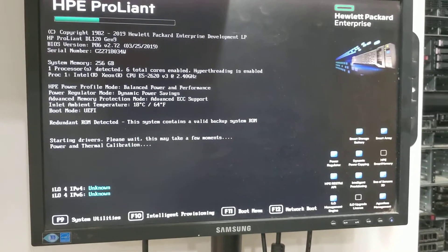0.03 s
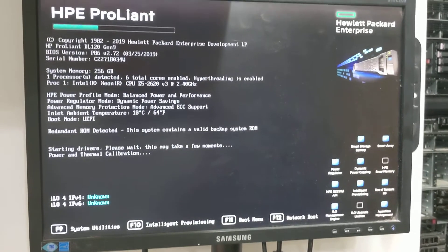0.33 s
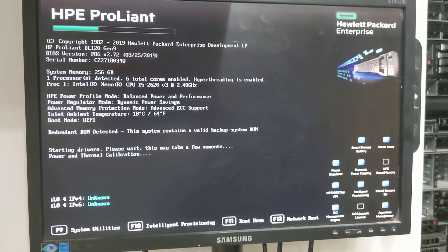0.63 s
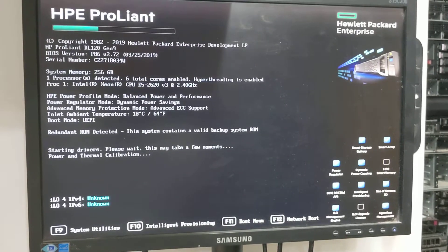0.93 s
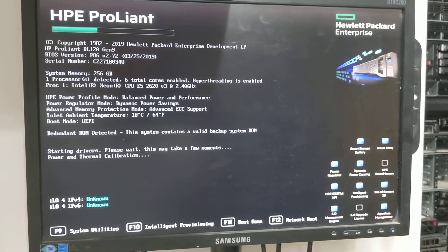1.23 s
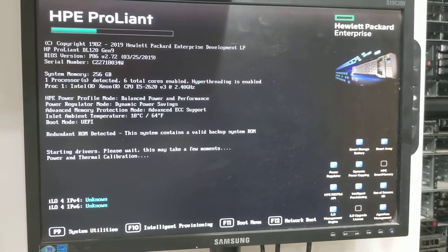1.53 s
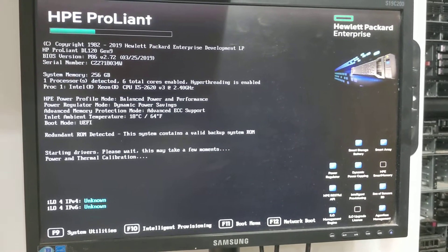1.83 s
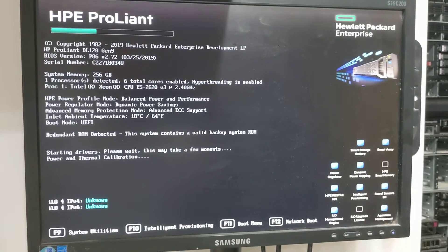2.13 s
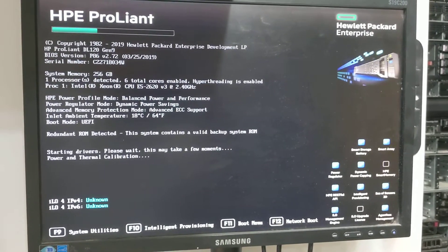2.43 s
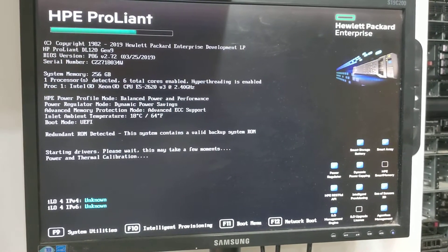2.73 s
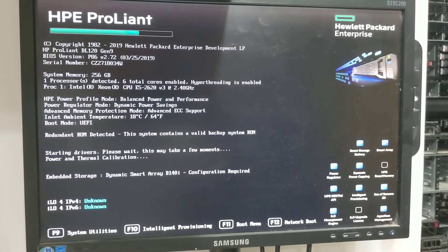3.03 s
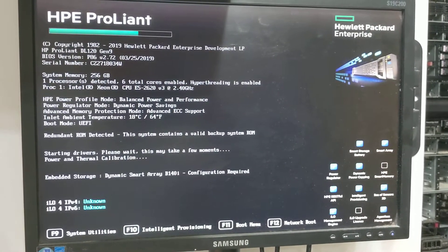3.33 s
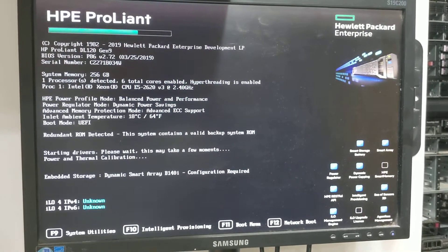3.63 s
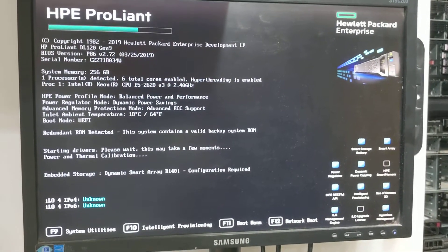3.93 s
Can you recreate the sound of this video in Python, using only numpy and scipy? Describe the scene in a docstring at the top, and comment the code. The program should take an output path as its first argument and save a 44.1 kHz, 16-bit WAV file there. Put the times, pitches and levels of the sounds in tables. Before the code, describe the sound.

Server cooling fans whine steadily over rushing air and a faint low hum.

```python
"""Three small, fast server fans whine in a machine room, close to a phone with two microphone ports.
Blades passing the struts make their tones, which beat as the speeds hunt around 237 turns a second.
Air rushes through the grille and rings the case. Behind it, other machines add thin steady tones
and a low hum; a second hum slowly sinks in pitch, and a faint higher drone comes in late."""
import sys
import numpy as np
from scipy import signal
from scipy.fft import rfft, irfft
from scipy.io import wavfile
from scipy.ndimage import uniform_filter1d, map_coordinates

SR = 44100
rng = np.random.default_rng(int(sys.argv[2]) if len(sys.argv) > 2 else 0)


def master(y):
    """Save y as 16-bit WAV."""
    cut = np.clip(np.atleast_2d(y).T, -1, 1)
    pcm = np.round(cut * 32767)  # scale
    wavfile.write(sys.argv[1], SR, pcm.astype(np.int16))


N = 176400

# Each fan's speed as its controller hunts. Each row: time in seconds, turns per second.
FAN_A_SPEED = [(0, 238.8), (.5, 238.3), (1.1, 238.2), (1.9, 238.9), (2.8, 238.3), (3.2, 238.7),
               (3.6, 238.3), (4, 238.4)]
FAN_B_SPEED = [(0, 236.5), (.35, 236.6), (.55, 235.7), (1.2, 235.8), (1.8, 236.3), (1.97, 238),
               (2.5, 238.1), (3.05, 237.7), (3.2, 237.1), (3.55, 237.7), (3.8, 237.3), (4, 235.8)]
FAN_C_SPEED = [(0, 237), (.3, 237.1), (.9, 236.8), (1.05, 235.6), (1.3, 234.8), (2.2, 235.1), (2.35, 237),
               (3.05, 236.9), (3.35, 235.6), (4, 235.9)]
# Each fan's tones. Each row: multiple of the shaft speed, left and right level in dB before
# the whine's fader, phase lead of the left port in radians.
FAN_A_TONES = [(2, -71, -72, 0.4), (3, -62.5, -66, 1.8), (5, -49.5, -47.5, -2.5), (7, -74, -59.5, -0.5),
               (8, -53, -56, -1.5), (10, -55.5, -48.5, 0.3), (12, -63, -58.5, -2.5), (18, -62, -55, 1)]
FAN_B_TONES = [(1, -74.5, -77.5, 0.5), (3, -68, -69, 1.9), (5, -48, -46, -2.5), (6, -72, -64, -0.2),
               (8, -57.5, -56.5, -0.5), (10, -45.1, -42, 2), (13, -56.5, -55.5, -2), (15, -63, -59, 0),
               (20, -65, -57, -1.8)]
FAN_C_TONES = [(2, -70, -71, 0.3), (5, -52, -49.5, -2.5), (8, -55, -47.5, 0.4), (10, -49.5, -46.5, 1.43),
               (13, -57.5, -55, -1.2), (15, -66, -59, -2), (20, -63, -51, 3), (25, -69, -56, 1.5)]
# The fader on the whine of all three fans. Each row: time in seconds, gain in dB.
WHINE_FADER = [(0, 0.5), (.45, 1.2), (1.1, 1), (1.9, -0.4), (2.65, 0.5), (3.5, -0.5), (4, -2)]

# The broad colour of the rushing air. Each row: frequency in Hz, left and right base level in dB per Hz.
AIR_COLOUR = [(20, -86, -80), (88.5, -80.5, -88), (167, -89.5, -91), (235, -88.0, -90.5), (325, -81, -83.5),
              (650, -75.5, -77), (870, -81, -83.5), (1090, -77.0, -72.5), (1590, -77.5, -73),
              (2330, -77, -70.5), (3350, -74.5, -71.5), (4200, -78, -72), (5300, -79.9, -73.5),
              (6760, -82, -76.5), (7300, -81, -82.5), (8200, -78.5, -86.5), (9560, -81, -88.5),
              (10530, -86.5, -97.5), (12560, -93, -99.5), (14900, -99.9, -108.8)]
# Rings and notches of case and room. Each row: centre in Hz, width in Hz, left and right lift in dB.
CASE_RESONANCES = [(383, 20, -7, -7), (456, 50, 1, 2.5), (502, 23, -5, -7), (560, 26, -10, -5),
                   (741.5, 60, 6, 7), (1030, 116, 0, 3.5), (1150, 32, 2, -2.5), (1237, 70, 6, 4),
                   (1323, 45, -3, -4), (1417, 85, 0, 5), (1610, 37, 1, -1), (1813, 84, 5, 4),
                   (2240, 50, -5, 0), (2330, 200, 7, 4), (2486, 83, 1.5, 5.5), (2858, 86, 0, 6),
                   (2984, 155, 2.5, 4.5), (3470, 49, -2, -2), (3640, 60, -5, -9), (3680, 40, 2.5, 2),
                   (4150, 120, 2.5, 2.5), (4720, 140, 1, 5.5), (5890, 380, 0, 4.5), (6790, 260, -2, -3),
                   (7350, 70, -.5, 3.5)]
# How much of the rush both ports hear alike. Each row: frequency in Hz, share of the power from 0 to 1.
AIR_SHARED = [(60, .88), (400, .9), (650, .8), (860, .48), (1000, .18), (1220, .85), (1340, .42),
              (1800, .62), (2100, .46), (2500, .48), (2900, .74), (4300, .68), (5200, .55), (5850, .27),
              (6500, .44), (7600, .5), (9400, .42), (11000, .15)]
# How late that shared part reaches the right port. Each row: frequency in Hz, delay in milliseconds.
RIGHT_PORT_LAG = [(250, .13), (600, .32), (860, .26), (1000, .36), (1100, .52), (1600, .48), (2500, .54),
                  (4000, .52), (7000, .55), (9500, .54)]

# Other machines' tones. Each row: pitch in Hz, left and right level in dB, left phase lead in radians.
MACHINE_TONES = [(79.6, -70, -70, 0), (120, -77, -79, 0), (350, -64, -66, 0), (369, -68, -67, .1),
                 (739, -66, -68, .9), (1669, -70, -63, -1.3), (2042.5, -59, -64, .1)]
# The pitch of the low hum, the sinking hum and the late drone. Each row: time in seconds, pitch in Hz.
LOW_HUM_PITCH = [(0, 41.1), (1.09, 41.1), (1.25, 39.7), (4, 39.7)]
SINKING_HUM_PITCH = [(0, 60), (1.4, 60), (2.2, 58), (3, 54.5), (3.6, 52), (4, 47)]
DRONE_PITCH = [(0, 130), (2.7, 130), (3.3, 141), (4, 140)]
# How those three swell and fade. Each row: time in seconds, level in dB.
LOW_HUM_LEVEL = [(0, -59), (.4, -57.5), (1.2, -67), (1.7, -55.5), (2.25, -51), (2.8, -56.5), (3.4, -63),
                 (3.7, -50), (4, -56)]
SINKING_HUM_LEVEL = [(0, -65), (.9, -77), (1.3, -59), (1.5, -64), (2.1, -68.5), (2.6, -57), (3.1, -53.5),
                     (3.6, -52), (4, -66)]
DRONE_LEVEL = [(0, -93), (2.1, -75), (2.55, -66), (2.78, -82), (3, -66), (3.5, -67), (4, -73)]


def fan(speed, tones, jitter_share=0.00013):
    """Blades passing the struts whine at multiples of a slightly unsteady shaft speed."""
    shaft = angle(curve(speed) * (1 + jitter_share * drift(rate_hz=25)))
    return sum(wavering_tone(multiple * shaft + 2 * np.pi * rng.random(), left_db, right_db, lead)
               for multiple, left_db, right_db, lead in tones)


def wavering_tone(phase, left_db, right_db, lead, swell_db=0.94, scatter_share=0.083):
    """One tone at both ports: it swells slowly, and turbulent air scatters part of it."""
    swell = undb(swell_db * drift(rate_hz=3.02))
    ports = []
    for db, shift in ((left_db, lead), (right_db, 0)):
        scatter = scatter_share * (drift(rate_hz=70) + 1j * drift(rate_hz=70))
        wave = ((1 + scatter) * np.exp(1j * (phase + shift))).real
        ports.append(np.sqrt(2) * undb(db) * swell * wave)
    return np.array(ports)


def airflow(flicker_db=0.43):
    """Turbulent rush: one part reaches the left port first, the rest washes in from the room."""
    hz = np.arange(N // 2 + 1) * SR / N
    direct, room_left, room_right = rfft(rng.standard_normal((3, N)))
    share = over_pitch(hz, AIR_SHARED)
    delay = np.exp(-2j * np.pi * hz * over_pitch(hz, RIGHT_PORT_LAG) / 1000)
    near = np.sqrt(share) * np.array([direct, direct * delay])
    diffuse = np.sqrt(1 - share) * np.array([room_left, room_right])
    colour_db = case_colour(hz) + rack_ripple(hz)
    rush = (near + diffuse) * undb(colour_db) * np.sqrt(SR / 2)
    # Each octave flickers on its own; everything below 500 Hz moves as one band.
    octave = np.floor(np.log2(np.maximum(hz, 250) / 250))
    return sum(irfft(rush * (octave == band), N) * undb(flicker_db * drift(rate_hz=14))
               for band in np.unique(octave))


def case_colour(hz):
    """The air's spectrum in dB at each port, with the rings and notches of case and room."""
    db = np.array([over_pitch(hz, AIR_COLOUR, column=1), over_pitch(hz, AIR_COLOUR, column=2)])
    for centre, width, left_db, right_db in CASE_RESONANCES:
        bell = np.exp(-(2 * (hz - centre) / width) ** 2)
        db += np.outer([left_db, right_db], bell)
    return db


def rack_ripple(hz, depth_db=0.75, spacing_hz=35.02):
    """Reflections between the racks leave fine, uneven peaks and dips, different at each port."""
    heights = rng.standard_normal((2048, 2)).T
    bumps = np.array([map_coordinates(port, [hz / spacing_hz], mode="mirror") for port in heights])
    return depth_db * bumps / bumps.std()


def machines():
    """Other machines in the room hold thin tones at a steady pitch."""
    return sum(wavering_tone(angle(hz), left_db, right_db, lead)
               for hz, left_db, right_db, lead in MACHINE_TONES)


def hum(pitch, level):
    """A deep, nearly pure hum that glides and swells, alike at both ports."""
    return np.sqrt(2) * undb(curve(level)) * np.sin(angle(curve(pitch)))


def undb(db):
    """Decibels as a gain."""
    return 10 ** (np.asarray(db) / 20)


def curve(points):
    """A table of times and values, read at every sample."""
    return np.interp(np.arange(N) / SR, *np.array(points, float).T)


def over_pitch(hz, table, column=1):
    """One column of a table, read on a log-frequency axis."""
    table = np.array(table, float)
    return np.interp(np.log(hz + 1), np.log(table[:, 0]), table[:, column])


def drift(rate_hz):
    """Smooth random wander with a spread of 1."""
    hold = max(int(SR / rate_hz), 2)
    steps = np.repeat(rng.standard_normal(N // hold + 2), hold)
    smooth = uniform_filter1d(uniform_filter1d(steps, hold), hold)[:N]
    return smooth / smooth.std()


def angle(hz):
    """Running angle in radians of something that turns at hz, from a random start."""
    return 2 * np.pi * (np.cumsum(hz * np.ones(N)) / SR + rng.random())


def scene():
    """The fans and their rush up front, the room's tones and hums behind."""
    fans = fan(FAN_A_SPEED, FAN_A_TONES) + fan(FAN_B_SPEED, FAN_B_TONES) + fan(FAN_C_SPEED, FAN_C_TONES)
    whine = fans * undb(curve(WHINE_FADER))
    low_hum = hum(LOW_HUM_PITCH, LOW_HUM_LEVEL)
    sinking_hum = hum(SINKING_HUM_PITCH, SINKING_HUM_LEVEL)
    drone = hum(DRONE_PITCH, DRONE_LEVEL)
    return whine + airflow() + machines() + low_hum + sinking_hum + drone


def record(dry):
    """The phone cuts off the top of the treble."""
    cutoff_hz = 15600
    return signal.sosfilt(signal.ellip(10, .1, 80, cutoff_hz, fs=SR, output="sos"), dry)


dry = scene()
out = record(dry)
master(out)
```